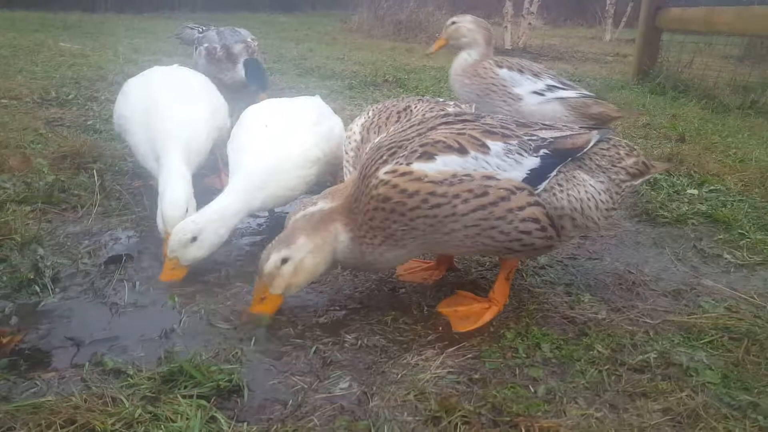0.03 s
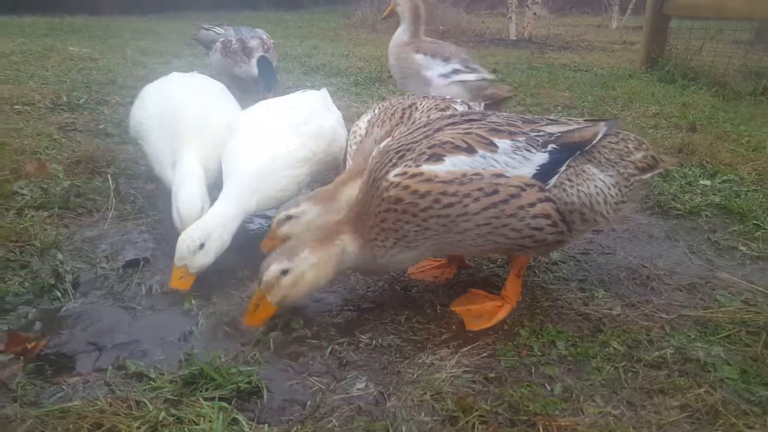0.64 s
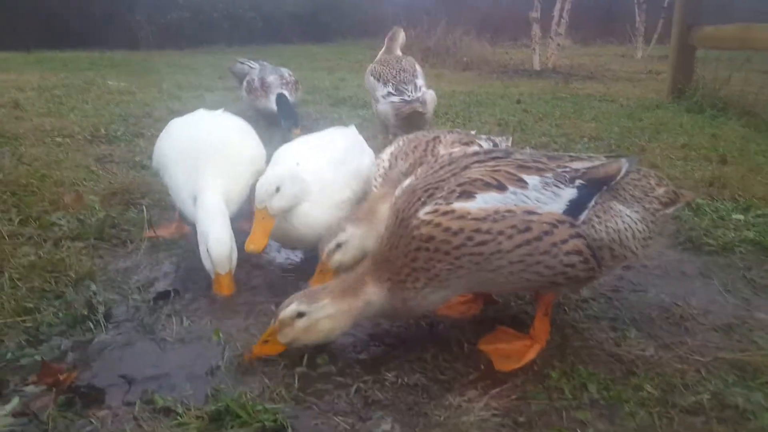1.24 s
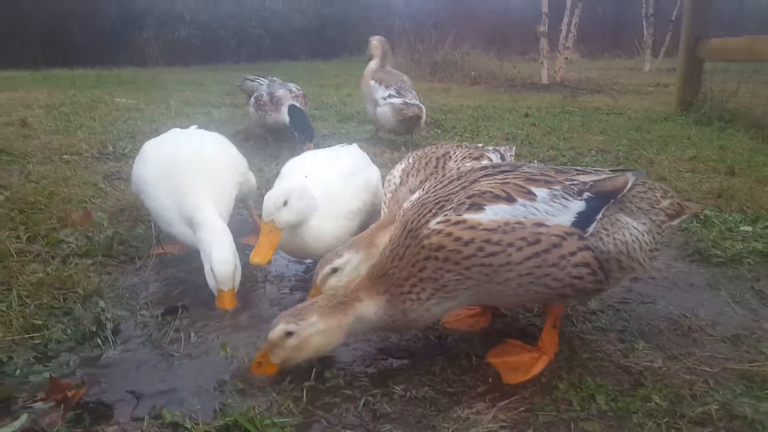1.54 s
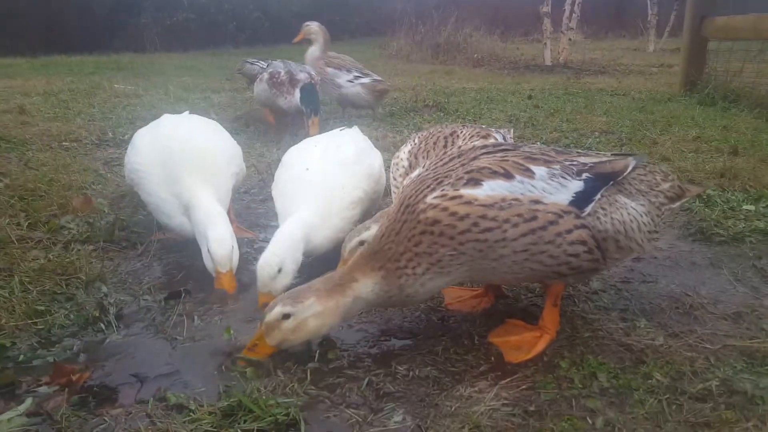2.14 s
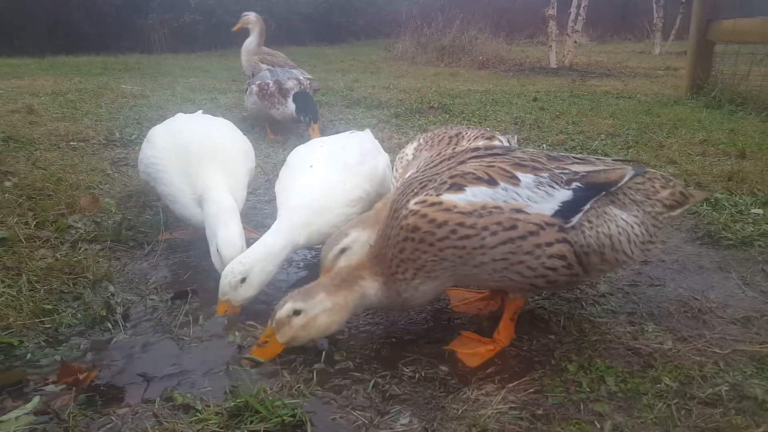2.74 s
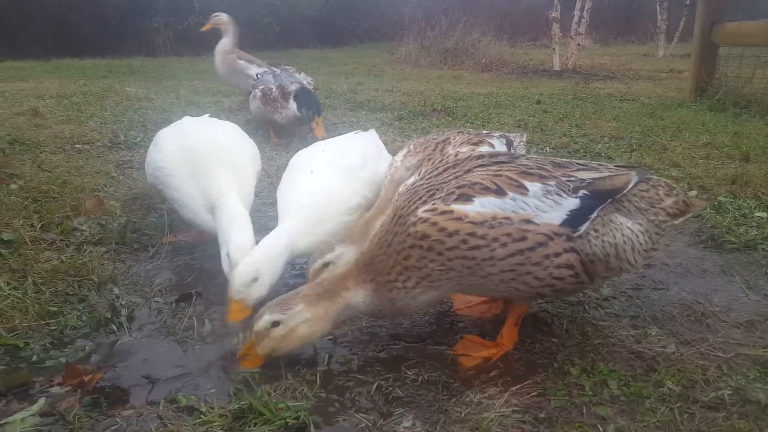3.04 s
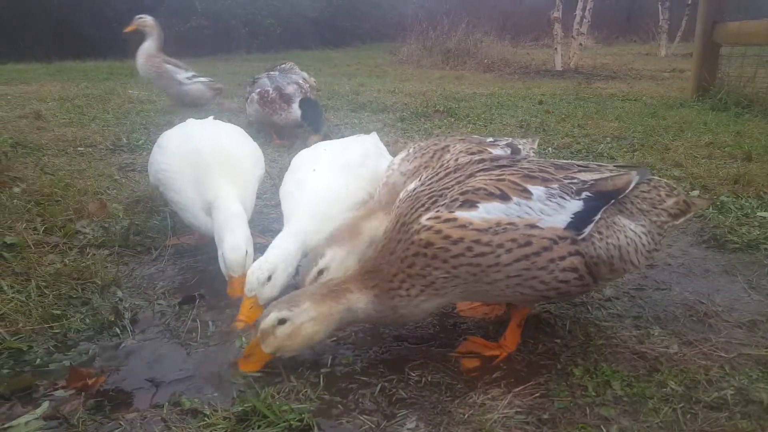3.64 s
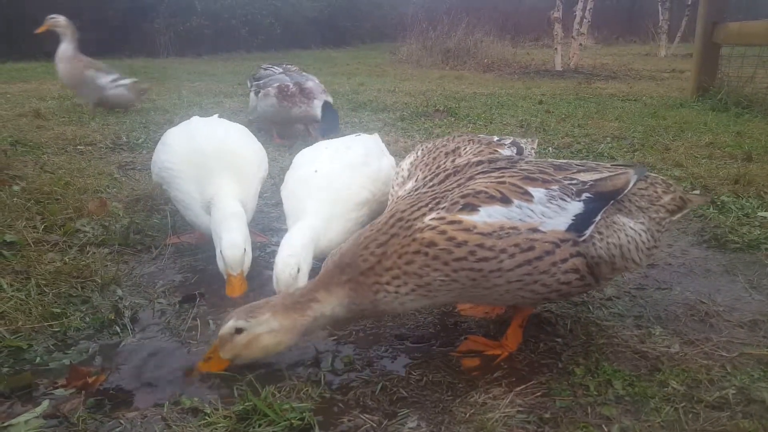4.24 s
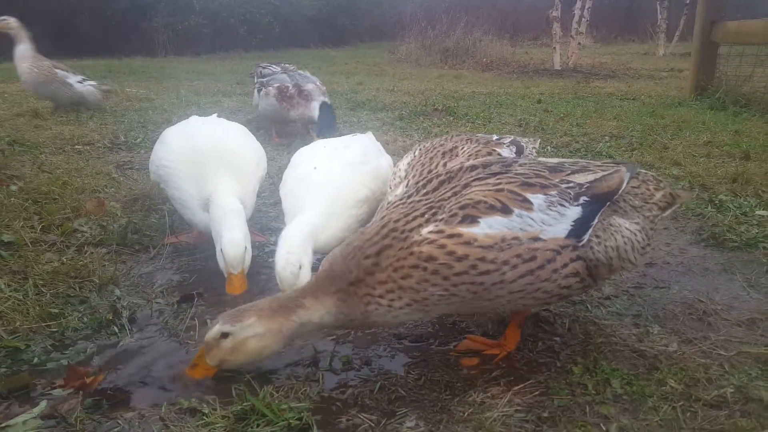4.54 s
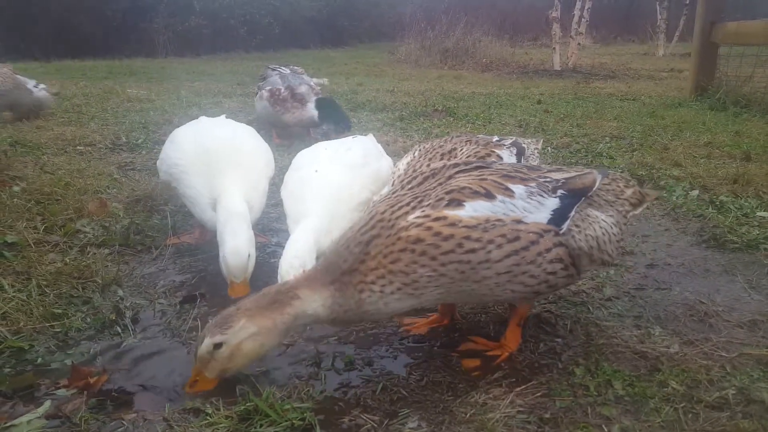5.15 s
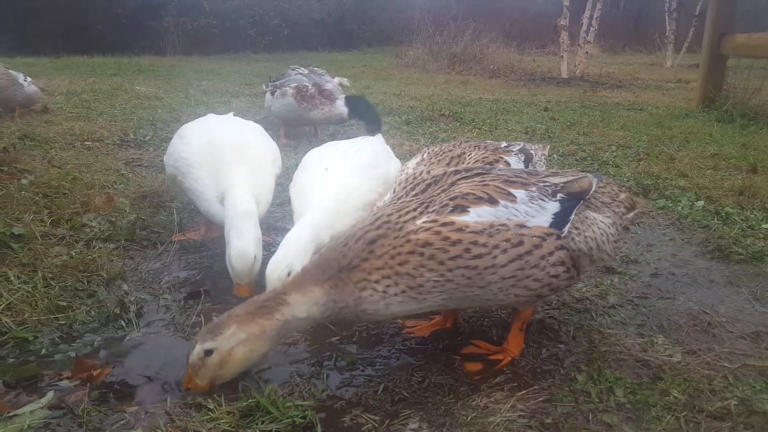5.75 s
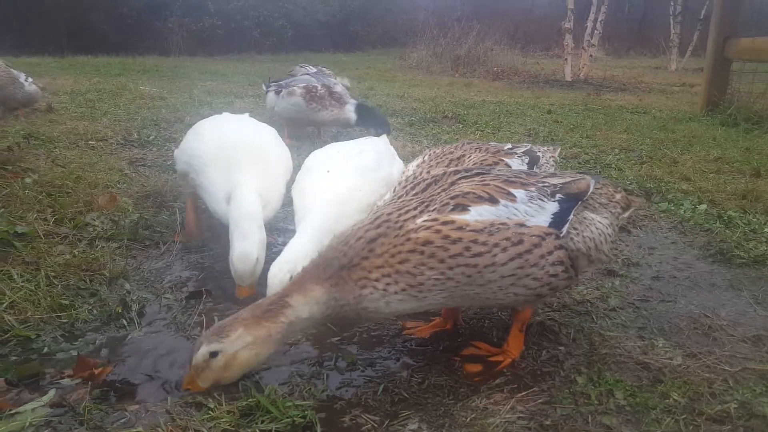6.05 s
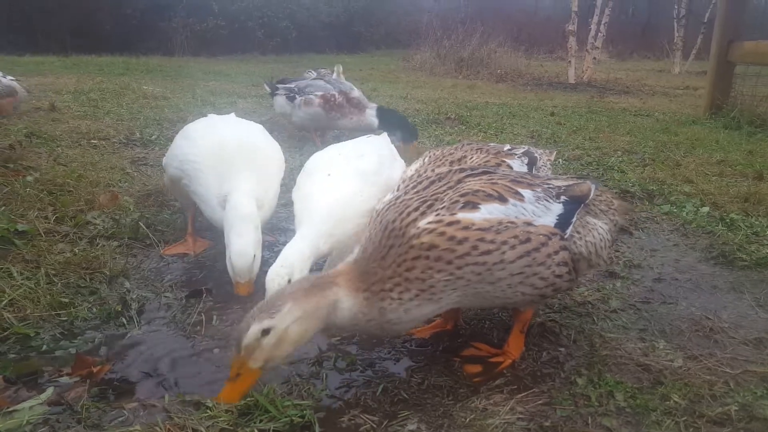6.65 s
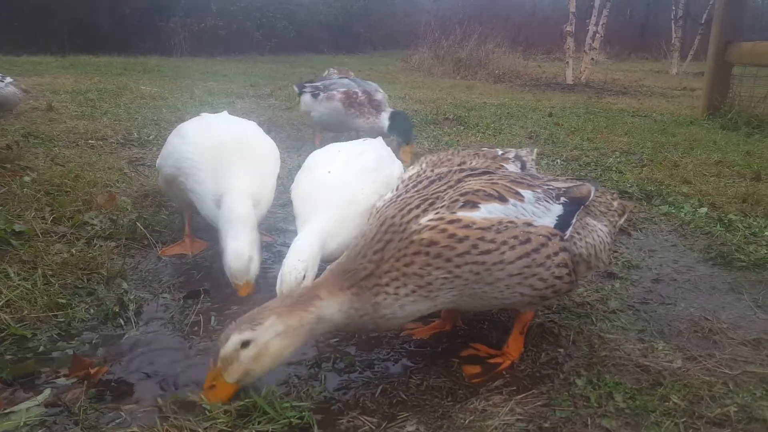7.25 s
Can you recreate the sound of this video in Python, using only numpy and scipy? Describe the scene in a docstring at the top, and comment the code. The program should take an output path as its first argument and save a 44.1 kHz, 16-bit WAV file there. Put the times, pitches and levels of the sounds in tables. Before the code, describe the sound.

Close, quick wet smacking and slurping of duck bills sieving mud and water, with occasional squelches and light wind outdoors.

```python
"""A muddy puddle outdoors, ducks dabbling close to a camera's stereo microphone, off to its left.
Their bills smack, suck and sieve the mud on a quick beat, louder as they work harder.
Every smack is a clump of bursting bubbles; single bubbles ring out, thin water films tick, and now
and then the mud squelches or thuds. A low rumble lies in the distance, and light air brushes the
two microphone ports."""
import sys
import numpy as np
from scipy import signal
from scipy.fft import rfft, irfft, next_fast_len
from scipy.io import wavfile
from scipy.ndimage import map_coordinates

SR = 44100
rng = np.random.default_rng(int(sys.argv[2]) if len(sys.argv) > 2 else 0)


def to_wav(s):
    """Save 16-bit WAV."""
    ch = np.atleast_2d(s).T  # columns
    pcm = np.round(np.clip(ch, -1, 1) * 32767)  # PCM
    wavfile.write(sys.argv[1], SR, pcm.astype(np.int16))


N = 321489

TOP_HZ = 16000  # the camera's band limit
ONSET_S = .012  # lead-in of a clump before its main burst
RETURN_DB = -1  # a bill's return stroke against its main one


def smacks(strokes):
    """Each snap of a bill bursts a clump of mud bubbles and squeezes out a little fine spray."""
    # the loudest snaps, tight or drawn out (time [s], level [dB], bubble pitch [Hz], time spread [s])
    loud_smacks = [(0.019, -41, 2000, 0.0027), (0.065, -43, 3330, 0.0018), (0.179, -44, 4820, 0.0013),
                   (0.223, -35.5, 3250, 0.00178), (0.254, -38, 1380, 0.0036), (0.32, -42.5, 2170, 0.00352),
                   (0.417, -35, 2440, 0.0038), (0.437, -33.5, 1394, 0.004), (0.457, -36, 2310, 0.0028),
                   (0.506, -44, 2200, 0.0023), (0.568, -38, 2704, 0.0018), (0.68, -38, 2520, 0.0044),
                   (0.748, -40.5, 3070, 0.0022), (0.832, -34.5, 2390, 0.0026), (0.846, -34.5, 2108, 0.0026),
                   (0.863, -34.5, 1360, 0.0016), (0.869, -37, 3930, 0.0027), (0.907, -38.5, 2400, 0.0027),
                   (0.931, -42, 3000, 0.0023), (0.978, -38, 3900, 0.002), (1.081, -39.5, 3620, 0.0032),
                   (1.105, -40, 2060, .004), (1.155, -40.5, 3080, 0.0051), (1.214, -40, 2400, 0.0028),
                   (1.245, -44, 2400, 0.0031), (1.3568, -33, 3590, 0.00087), (1.385, -37.5, 1040, 0.0018),
                   (1.391, -35, 1780, 0.0017), (1.446, -38.5, 2250, 0.0027), (1.479, -39, 730, 0.0016),
                   (1.489, -35.5, 885, 0.0016), (1.524, -34.5, 2950, 0.00293), (1.702, -34, 1810, 0.0022),
                   (1.721, -29.5, 1650, 0.0031), (1.734, -36.5, 2700, 0.0042), (1.749, -30, 2700, 0.0014),
                   (2.024, -37, 1764, 0.0035), (2.276, -43.5, 1730, 0.0029), (2.338, -38, 3600, .003),
                   (2.357, -33, 3525, 0.0014), (2.386, -38, 1520, 0.0032), (2.46, -30.5, 1080, 0.0011),
                   (2.489, -40.5, 2840, 0.0014), (2.589, -30, 2830, 0.002), (2.658, -39, 2962, 0.0031),
                   (2.717, -36, 2860, 0.004), (2.779, -38.5, 4320, 0.0015), (2.792, -42.5, 3470, 0.0032),
                   (2.832, -39.5, 2884, 0.0031), (2.895, -31, 1107, 0.0033), (3.07, -40, 2180, 0.00082),
                   (3.087, -40, 2628, 0.0016), (3.127, -36, 2860, .0012), (3.31, -39, 3220, 0.0015),
                   (3.384, -41, 2400, 0.0014), (3.492, -35.5, 3800, 0.003), (3.677, -35.5, 2240, 0.001),
                   (3.933, -33, 1450, 0.00328), (3.942, -35, 2520, .0018), (4.05, -42, 2100, 0.0017),
                   (4.135, -40, 2150, 0.00157), (4.579, -39, 3560, 0.0015), (4.653, -37, 2150, 0.0021),
                   (4.682, -36, 2906, 0.0045), (4.801, -39.5, 2700, 0.0035), (5.046, -40, 3280, 0.0011),
                   (5.142, -39, 3870, 0.0012), (5.284, -39.5, 3430, 0.0026), (5.346, -41, 2700, 0.0034),
                   (5.419, -39.5, 2750, 0.003), (5.477, -37.5, 1860, 0.0027), (5.507, -34.5, 2210, 0.0022),
                   (5.555, -34.5, 2290, 0.0027), (5.569, -33.5, 1390, 0.0016), (5.604, -37.5, 1650, 0.0018),
                   (5.614, -31.5, 1200, 0.0017), (5.624, -34, 1100, 0.0019), (5.634, -33, 1770, 0.0029),
                   (5.645, -35.5, 1603, .0026), (5.658, -35, 2000, 0.0027), (5.692, -39.5, 2240, 0.00093),
                   (5.75, -35.5, 1560, .0027), (5.762, -33, 1636, 0.0029), (5.776, -42, 1650, 0.0025),
                   (5.819, -47, 1990, 0.0025), (5.866, -32.5, 2550, 0.0016), (5.881, -34.5, 1790, 0.004),
                   (5.923, -30.5, 1646, 0.0012), (5.93, -35, 3530, 0.0017), (5.98, -44, 1930, 0.0026),
                   (5.988, -38.5, 3400, 0.0028), (6.019, -38, 2040, 0.0024), (6.033, -38.5, 2780, 0.0014),
                   (6.081, -39.5, 1610, 0.003), (6.121, -37, 1700, 0.003), (6.149, -34.5, 1706, 0.00364),
                   (6.208, -37, 1250, 0.0065), (6.251, -40, 2100, 0.0022), (6.287, -31, 2886, .003),
                   (6.351, -40.5, 1710, 0.0018), (6.482, -37.5, 1600, 0.0039), (6.491, -36.5, 2640, .002),
                   (6.553, -34, 1970, 0.0043), (6.585, -33.5, 1870, 0.0022), (6.601, -41, 2700, 0.002),
                   (6.628, -35.5, 1670, 0.0038), (6.646, -43, 2270, 0.00074), (6.661, -30.5, 2030, 0.0039),
                   (6.701, -31.5, 2930, 0.0038), (6.719, -32, 1600, 0.0035), (6.738, -30.5, 2450, .0012),
                   (6.761, -34, 1770, 0.0065), (6.784, -33, 1874, 0.0039), (6.807, -38.5, 1600, 0.0014),
                   (6.83, -36.5, 1790, 0.0024), (6.84, -39, 2960, 0.0026), (6.89, -38, 1880, 0.0019),
                   (6.915, -36, 4000, 0.0024), (6.944, -40.5, 2120, 0.0013), (7.162, -36.5, 1400, 0.0047),
                   (7.192, -39, 2872, 0.0021), (7.228, -39.5, 2800, 0.0016)]
    soft = nibbles(strokes, loud_smacks, share=.38, db=-43.5, grows=0.97, scatter_db=-1,
                   hz=2780, octaves_per_db=0.0177, scatter_octaves=0.19)
    soft_spread_s = 0.0038
    track = np.zeros((2, N))
    for s, db, hz, spread_s in [*loud_smacks, *[(*row, soft_spread_s) for row in soft]]:
        # big, low pockets burst alone and are damped by the mud; small ones come in a ringing crowd
        smallness = hz / 2000
        # a tight snap is mostly one burst, a drawn-out one is all bubbles
        crowd_db = -3 + 10 * np.log10(smallness) + 24 * np.log10(spread_s / .003)
        pop = clump(hz, pitch_spread=0.427, cycles=0.73 * smallness ** .5, spread_s=spread_s,
                    crowd_db=crowd_db, count=28)
        spray = clump(6800, pitch_spread=.5, cycles=.8, spread_s=1.5 * spread_s, crowd_db=0, count=44)
        add(track, s - ONSET_S, amp(db) * (pop + amp(-10) * smallness ** 0.53 * spray))
    return track


def clump(hz, pitch_spread, cycles, spread_s, crowd_db, count, size=1400):
    """One main burst amid a crowd of bubbles that builds and thins; the energy of 10 ms at rms 1."""
    when, pitch, strength, life = rng.standard_normal((4, count + 1))
    when[0] = pitch[0] = 0
    life[0] = -1  # the main burst is choked at once, others ring on
    gain = amp(crowd_db + 3 * strength - 8 * np.abs(when)) * rng.choice([-1, 1], count + 1)
    gain[0] = 1
    start = ONSET_S + spread_s * when + port_lead(count + 1)
    pitch -= np.average(pitch, weights=gain ** 2)  # the notes gather around the clump's pitch
    ring_hz = np.minimum(hz * np.exp(pitch_spread * pitch), TOP_HZ)
    ring_cycles = cycles * np.exp(.42 * life)
    rings = bubble(np.arange(size) / SR - start[..., None], ring_hz[:, None], ring_cycles[:, None])
    deepest_hz = 450  # the shallow puddle gives out little below this note
    low_cut = signal.butter(3, deepest_hz, 'high', fs=SR)
    burst = signal.lfilter(*low_cut, (gain[:, None] * rings).sum(1))
    return unit(burst) * np.sqrt(SR / 100 / size)


def bubble(t, hz, cycles):
    """A bubble's note builds up and dies within a few cycles; all pitches carry the same energy."""
    turns = np.maximum(t, 0) * hz
    return np.sqrt(hz / cycles) * np.sin(2 * np.pi * turns) * turns / cycles * np.exp(-turns / cycles)


def bill_strokes(beat_hz=14.7, drift=.06):
    """Running count of strokes: a bill opens and closes once a beat, and the beat drifts a little."""
    return np.cumsum(2 * beat_hz * (1 + drift * wobble(6))) / SR


def effort(usual_db=-47):
    """How far the ducks' effort lies above the usual, in dB."""
    # how hard the ducks work the mud (time [s], effort [dB])
    work = [(0.0, -41.5), (0.16, -55), (0.24, -45), (0.78, -48.5), (0.9, -42), (1.06, -54), (1.18, -44),
            (1.52, -47), (1.58, -49), (1.68, -46), (1.94, -50), (2.24, -46.5), (2.32, -44), (2.72, -49.5),
            (2.92, -47), (3.37, -49), (3.95, -45.5), (4.45, -52.5), (4.63, -44.5), (4.99, -49.5),
            (5.45, -47), (5.63, -43), (6.43, -49.5), (6.73, -41), (7.05, -53.5), (7.29, -41.5)]
    return curve(work) - usual_db


def nibbles(strokes, loud, share, db, grows, scatter_db, hz, octaves_per_db, scatter_octaves):
    """Soft snaps on a share of the strokes, louder with effort: (time [s], level [dB], pitch [Hz])."""
    jitter_s, busy_s = 0.0048, .02
    at = np.flatnonzero(np.diff(np.floor(strokes)))
    chosen = rng.random(len(at)) < share
    late, strength, pitch = rng.standard_normal((3, len(at)))
    s = at / SR + jitter_s * late
    work_db = effort()[at]
    level_db = db + grows * work_db + scatter_db * strength + RETURN_DB * (np.arange(len(at)) % 2)
    pitch_hz = hz * 2 ** (octaves_per_db * work_db + scatter_octaves * pitch)
    # a bill makes no soft snap close to a loud one
    free = np.abs(s[:, None] - np.array(loud)[:, 0]).min(1) > busy_s
    return np.transpose([s, level_db, pitch_hz])[free & chosen]


def ticks(strokes):
    """Thin water films break at the bills in a short, bright crackle: the louder, the tighter."""
    # the loudest films snapping (time [s], level [dB], pitch [Hz])
    loud_ticks = [(0.235, -36.5, 5300), (0.833, -31.5, 10500), (0.856, -34, 7930), (0.906, -35.5, 8650),
                  (1.247, -39.5, 8000), (1.277, -35, 7700), (1.313, -33.5, 11360), (1.639, -33.5, 9100),
                  (1.728, -37.5, 8300), (2.156, -37, 7200), (2.336, -37.5, 6120), (2.491, -38.5, 9050),
                  (2.546, -31, 9840), (2.618, -38.5, 6130), (2.687, -40, 8240), (2.956, -36, 8700),
                  (3.57, -38, 8680), (3.723, -40, 8744), (4.141, -37.5, 9400), (4.732, -37, 9430),
                  (4.947, -35.5, 8550), (5.073, -35.5, 10700), (5.866, -38.5, 5960), (5.955, -33.5, 9850),
                  (6.284, -37.5, 8160), (6.717, -34.5, 8700), (7.057, -27.5, 8400), (7.193, -34, 9750)]
    soft = nibbles(strokes, loud_ticks, share=.36, db=-42, grows=0.2, scatter_db=1.2,
                   hz=7730, octaves_per_db=0, scatter_octaves=0.26)
    track = np.zeros((2, N))
    for s, db, hz in [*loud_ticks, *soft]:
        spread_s = np.clip(.0018 * amp(-.6 * (db + 35)), .0005, .004)
        cycles = 1.8 * np.exp(rng.uniform(-.3, .5))  # some films ring, others just break
        snap = clump(hz, pitch_spread=.15, cycles=cycles, spread_s=spread_s, crowd_db=-5, count=44)
        add(track, s - ONSET_S, amp(db) * snap)
    return track


def sieving(strokes):
    """The bills chatter and pump water out at their edges in quick spurts of froth."""
    # tone of the muddy slosh (frequency [Hz], gain [dB])
    slosh_tone = [(150, -38), (300, -1), (480, -14.5), (680, -0.5), (1020, 0), (1600, 0.5), (2600, 5.5),
                  (4000, 3), (5200, -23), (7000, -21), (16000, -70)]
    # tone of the fine fizz (frequency [Hz], gain [dB])
    fizz_tone = [(2000, -12), (4000, 5), (5200, -2), (7000, -4.5), (9200, 0), (16000, -7)]
    # amount of fine spray, which the fizz partly follows (time [s], level [dB])
    spray_levels = [(0.0, -63), (0.91, -52), (2.11, -65), (2.29, -54), (7.29, -55)]
    pump_db = 1.64 * np.cos(2 * np.pi * strokes) + RETURN_DB * np.cos(np.pi * strokes / 2) ** 2
    spurt_db = pump_db + 4 * np.tanh(wobble(130))  # random sputter on top of the strokes
    bubbles = froth(400, 5000, cycles=1.25, spread_db=3, count=10000, size=500)
    # a few bubbles float free of the mud and ring on
    ringing = froth(900, 4500, cycles=3, spread_db=2, count=1400, size=1000)
    slosh = coloured(unit(bubbles) + amp(-4.5) * unit(ringing), slosh_tone) * amp(spurt_db)
    fizz = coloured(froth(4650, 16600, cycles=1.5, spread_db=5, count=42000, size=70), fizz_tone)
    fizz *= amp(1.46 * spurt_db + 3.45 * wobble(150))
    spray_db = curve(spray_levels)
    slosh_db = -48 + effort()
    fizz_db = -51.5 + 0.69 * (spray_db - spray_db.mean()) + 0.44 * effort()
    return amp(slosh_db) * unit(slosh) + amp(fizz_db) * unit(fizz)


def froth(low_hz, high_hz, cycles, spread_db, count, size):
    """A stereo stream of tiny bubbles of random pitch and strength, each size samples long."""
    when, pitch, strength, sign = rng.random((count, 4)).T
    hz = low_hz * (high_hz / low_hz) ** pitch
    gain = amp(spread_db * np.minimum(-np.log(1 - strength), 4)) * np.sign(sign - .5)
    t = (np.arange(size) - 10) / SR - port_lead(count)[..., None]
    rings = gain[:, None] * bubble(t, hz[:, None], cycles)
    index = (when * N).astype(int)[:, None] + np.arange(size)
    return np.array([np.bincount(index.ravel(), port.ravel(), N)[:N] for port in rings])


def squelches(flutter_hz=230, flutter_db=4, trim_db=-4.5):
    """A pocket's hoarse note flutters as soft mud flaps, and slides as suction changes its size."""
    # air and water sucked through pockets in the mud
    # (time [s], length [s], start pitch [Hz], end pitch [Hz], width [Hz], level before trim [dB])
    pockets = [(0.18, 0.0053, 5900, 3940, 300, -32.5), (0.225, 0.0045, 5050, 4530, 200, -29.5),
               (0.25, 0.029, 702, 1105, 500, -37), (1.495, 0.053, 1296, 1570, 424, -31),
               (1.601, 0.044, 1423, 1520, 250, -38), (1.664, 0.037, 1760, 1460, 400, -35.5),
               (1.699, 0.057, 1681, 1401, 447, -31.5), (2.4175, .0045, 1785, 1970, 300, -24.5),
               (3.727, 0.04, 333, 520, 800, -37.5), (3.883, 0.031, 2050, 1550, 300, -38),
               (3.909, 0.021, 1565, 1340, 170, -27.5), (3.927, 0.053, 1640, 1348, 250, -33),
               (3.928, .03, 520, 593, 402, -39), (3.955, .025, 976, 627, 260, -29.5),
               (4.727, 0.059, 1478, 1533, 459, -37), (5.618, 0.06, 1417, 1690, 750, -35),
               (5.742, 0.046, 1562, 1432, 500, -33.5), (6.559, 0.024, 804, 606, 350, -40.5),
               (6.806, 0.0048, 4730, 4340, 250, -24.5)]
    track = np.zeros((2, N))
    for s, length, start_hz, end_hz, width_hz, db in pockets:
        note = swell(length, start_hz, end_hz, rasp(length, start_hz, width_hz))
        flap_hz = flutter_hz * (1 + 0.216 * wobble(flutter_hz)[:note.shape[1]])
        flutter = amp(flutter_db * np.cos(2 * np.pi * np.cumsum(flap_hz) / SR))
        add(track, s, amp(db + trim_db) * unit(note * flutter))
    return track


def rasp(length, pitch_hz, width_hz, size=8192):
    """The uneven strength and phase of a resonance, width_hz wide, kicked by turbulent spurts."""
    kicks = ([1, 1j] @ rng.standard_normal((2, size))) * amp(2.4 * wobble(403.7)[:size])
    ring = signal.lfilter([1], [1, -np.exp(-np.pi * width_hz / SR)], kicks)
    # soft mud rounds off each kick
    ring = signal.lfilter(*signal.butter(2, pitch_hz, fs=SR), ring)[-int(length * SR):]
    steady = np.exp(-(width_hz / 250) ** 2)  # a sharply tuned pocket sings one steady note
    return np.sqrt(steady) + np.sqrt(1 - steady) * ring / np.sqrt(np.mean(np.abs(ring) ** 2))


def swell(length, start_hz, end_hz, drive=1):
    """A note that swells, glides and fades at both ports."""
    t = np.arange(int(length * SR)) / SR
    port_t = t + port_lead(1)
    turns = start_hz * port_t + (end_hz - start_hz) * port_t ** 2 / (2 * length)
    envelope = np.sqrt(2) * np.sin(np.pi * t / length) ** 0.25
    return envelope * np.real(drive * np.exp(2j * np.pi * turns))


def plips(decay_s=0.000547, rise_per_s=6.8, size=800):
    """A free bubble swells and dies in milliseconds, its note rising as it nears the surface."""
    # single bubbles with a clear note (time [s], level over 10 ms [dB], pitch [Hz])
    free_bubbles = [(0.986, -40, 2660), (1.3, -38.5, 2150), (3.127, -37, 2060), (3.512, -37.5, 2500),
                    (4.839, -40, 2374), (5.02, -35.5, 2640), (5.252, -41.5, 1740), (5.528, -40.5, 1040),
                    (5.671, -36, 1140), (5.735, -34, 1677), (5.947, -39.5, 1075), (6.504, -40.5, 1440),
                    (6.69, -38, 1352), (6.819, -41.5, 1080)]
    track = np.zeros((2, N))
    for s, db, hz in free_bubbles:
        t = np.maximum(np.arange(size) / SR - port_lead(1), 0)
        envelope = (t / decay_s) ** 3 * np.exp(-t / decay_s)
        note = envelope * np.sin(2 * np.pi * hz * t * (1 + rise_per_s * t / 2))
        add(track, s - 2 * decay_s, amp(db) * unit(note) * np.sqrt(SR / 100 / size))
    return track


def thuds():
    """Soft blows on wet ground: a few low cycles that sag in pitch."""
    # dull blows (time [s], length [s], nominal pitch [Hz], level [dB], left minus right [dB])
    blows = [(0.05, 0.013, 133, -37, -2), (0.249, 0.0098, 356, -41, 0), (1.437, 0.0032, 299, -32.5, 19.5),
             (1.726, 0.025, 121, -25.5, 3), (3.731, 0.0035, 323, -35.5, 6), (4.641, 0.0341, 91.8, -34, 3),
             (5.035, 0.02, 109.5, -33, -2.5), (5.084, 0.022, 122, -35.5, 9.5)]
    track = np.zeros((2, N))
    for s, length, hz, db, pan_db in blows:
        port_gain = amp(db + pan_db * np.array([[.5], [-.5]]))
        add(track, s, port_gain * swell(length, start_hz=hz * 1.175, end_hz=hz * 0.73))
    return track


def ground_echo(x, t60=0.084, size=2600):
    """Ground and feathered bodies throw back a brief, diffuse echo, different at each port."""
    t = np.arange(size) / SR
    tail = rng.standard_normal((2, size)) * amp(-60 * t / t60) * (1 - np.exp(-t / 0.00009))
    return signal.fftconvolve(x, unit(tail) / np.sqrt(size), axes=1)[:, :N]


def breeze(calm_db=-51):
    """Light air buffets each microphone port on its own; gusts swell and fade over the calm."""
    # tone of the buffeting (frequency [Hz], gain [dB])
    buffet_tone = [(20, -35), (55, 0), (110, 1.5), (180, -1), (300, -14), (700, -32), (2000, -98)]
    # gusts on the ports (peak time [s], half length [s], level [dB])
    gust_peaks = [(0.027, 0.132, -42.5), (0.853, 0.12, -44.5), (1.774, 0.12, -43), (3.198, .2, -45.5),
                  (4.45, 0.21, -43.5), (5.091, 0.08, -46), (6.73, 0.099, -44.5), (7.094, 0.19, -46.5)]
    t = np.arange(N) / SR
    gusting = sum(amp(db) * np.exp(-((t - s) / half) ** 2 / 2) for s, half, db in gust_peaks)
    buffet = coloured(rng.standard_normal((2, N)), buffet_tone)
    flicker_db = 3.4 * np.array([wobble(4.79), wobble(23)])
    return np.hypot(amp(calm_db), gusting) * unit(buffet * amp(flicker_db))


def distant_rumble():
    """A low, wavering outdoor rumble reaches both ports nearly alike."""
    # tone of the rumble (frequency [Hz], gain [dB])
    rumble_tone = [(20, -26), (40, -16), (65, -3), (115, 1), (165, -2), (230, -12), (400, -14), (700, -29),
                   (2000, -24.5), (6000, -31), (16000, -49)]
    far = rng.standard_normal(N) + amp(-12) * rng.standard_normal((2, N))
    return amp(-48.5 + 1.35 * wobble(4)) * unit(coloured(far, rumble_tone))


def port_lead(count, lead_s=0.0001594, scatter_s=.00005):
    """Arrival offsets (port, bubble): the puddle lies to the left, so that port hears it first."""
    return np.array([[-.5], [.5]]) * (lead_s + scatter_s * rng.standard_normal(count))


def amp(db):
    return 10 ** (np.asarray(db) / 20)


def unit(x):
    return x / np.sqrt(np.mean(x ** 2) + 1e-20)


def curve(rows):
    """One value per sample from (time [s], value) points."""
    return np.interp(np.arange(N) / SR, *np.transpose(rows))


def wobble(rate):
    """A smooth random curve, rate knots a second."""
    knots = rng.standard_normal(int(N * rate / SR) + 4)
    return unit(map_coordinates(knots, [np.arange(N) * rate / SR]))


def filtered(x, response):
    """x through a gain that depends on frequency."""
    size = next_fast_len(N + SR // 2)
    return irfft(rfft(x, size) * response(np.fft.rfftfreq(size, 1 / SR)), size)[..., :N]


def coloured(x, points):
    """x shaped by (frequency [Hz], gain [dB]) points on a log axis."""
    point_hz, db = np.transpose(points)
    return filtered(x, lambda hz: amp(np.interp(np.log(hz + 1), np.log(point_hz), db)))


def add(track, s, sound):
    """Mix a stereo sound into the track at s seconds."""
    start = max(round(s * SR), 0)
    track[:, start:start + sound.shape[1]] += sound[:, :max(N - start, 0)]


def scene():
    """The puddle close on the left, one beat driving its froth and soft snaps; open air behind."""
    # the right port faces away from the puddle and loses its treble (frequency [Hz], gain [dB])
    port_shadow = [(100, 5), (800, -0.5), (1400, 1), (2300, 2.5), (4300, 2), (5500, 0), (7000, -20),
                   (9000, -32), (12000, -11.5), (16000, -15)]
    background = thuds() + distant_rumble() + breeze()
    strokes = bill_strokes()
    puddle = sieving(strokes) + squelches() + smacks(strokes) + ticks(strokes) + plips()
    left, right = puddle + amp(-10.5) * ground_echo(puddle)
    return np.array([left, coloured(right, port_shadow)]) + background


def record(dry):
    """The camera's microphone colours the treble; nothing passes above the band limit."""
    # the microphone's dip in the high treble (frequency [Hz], gain [dB])
    mic_response = [(9300, -0.5), (10200, -5), (13000, 0.5)]
    return filtered(coloured(dry, mic_response), lambda hz: hz < TOP_HZ)


dry = scene()
out = record(dry)
to_wav(out)
```